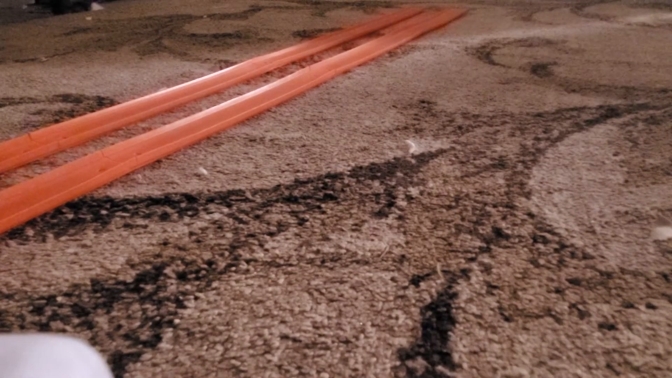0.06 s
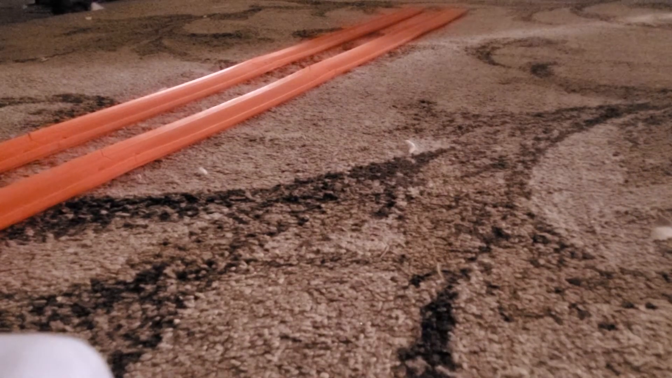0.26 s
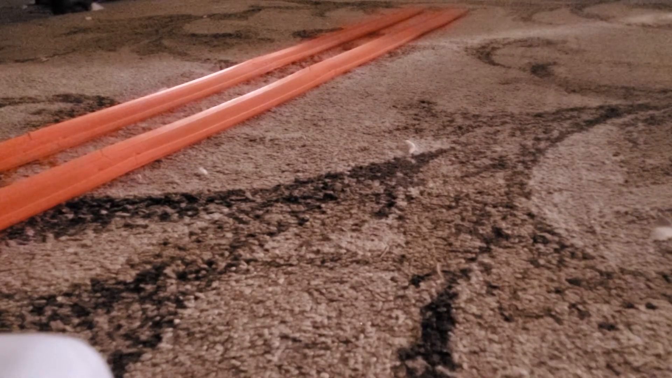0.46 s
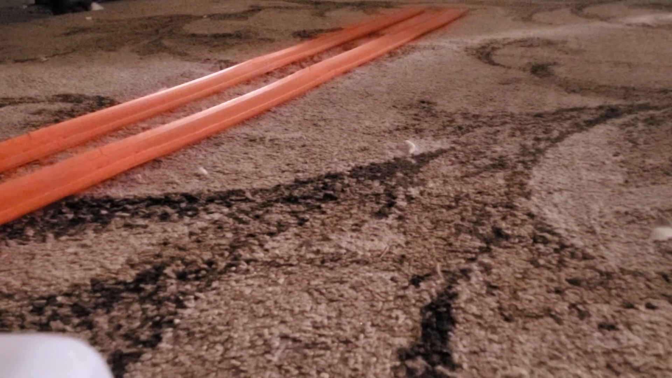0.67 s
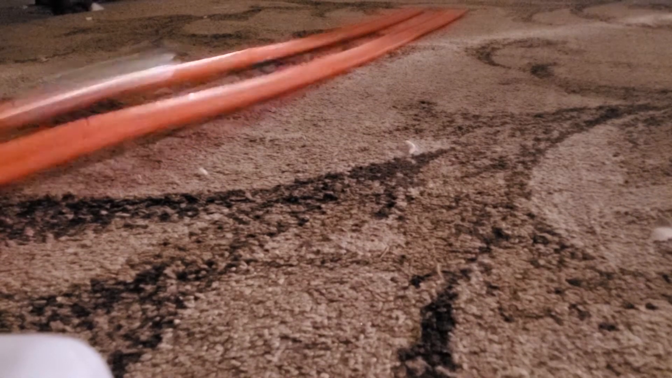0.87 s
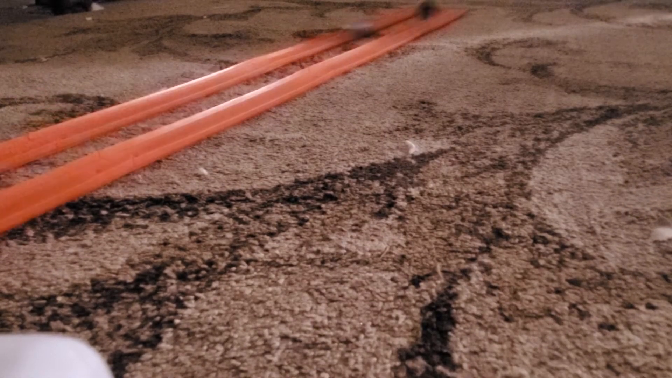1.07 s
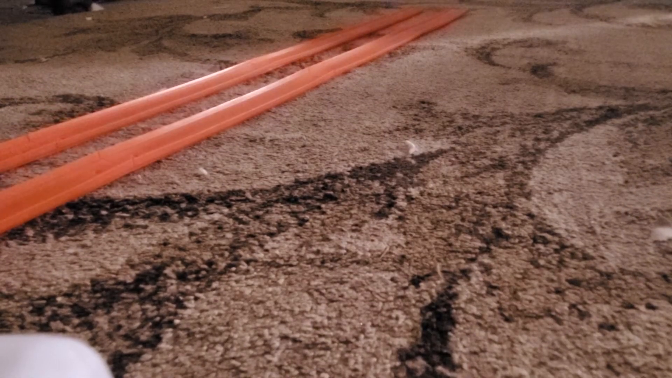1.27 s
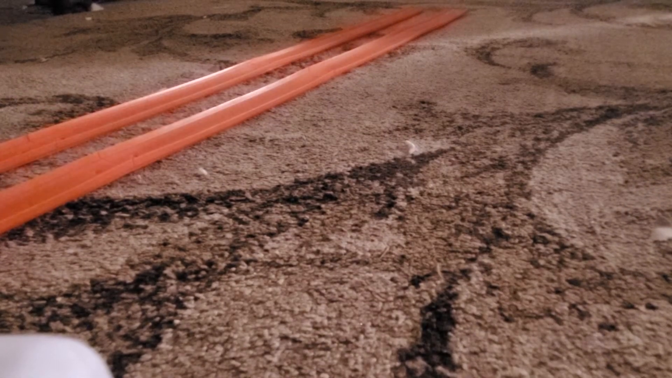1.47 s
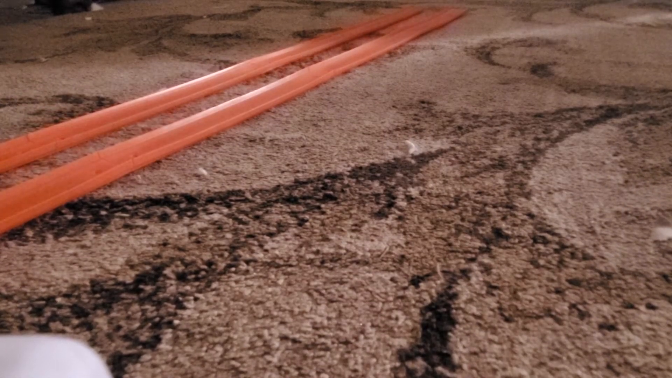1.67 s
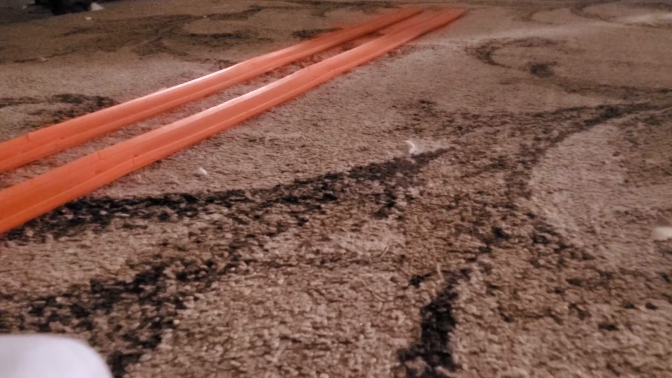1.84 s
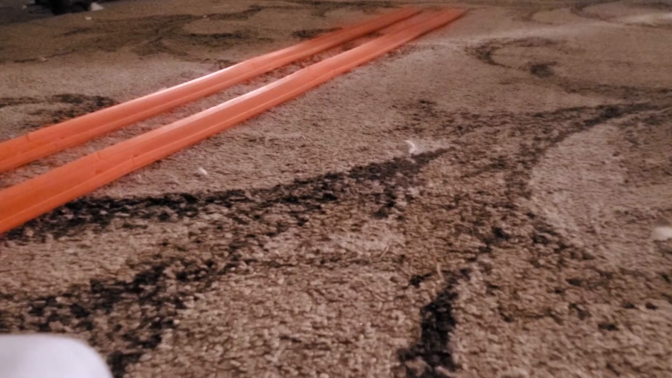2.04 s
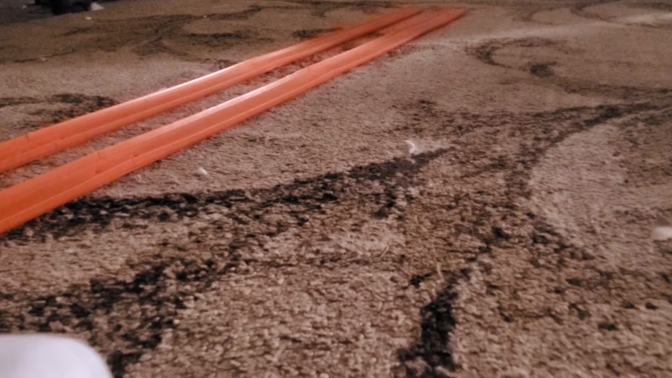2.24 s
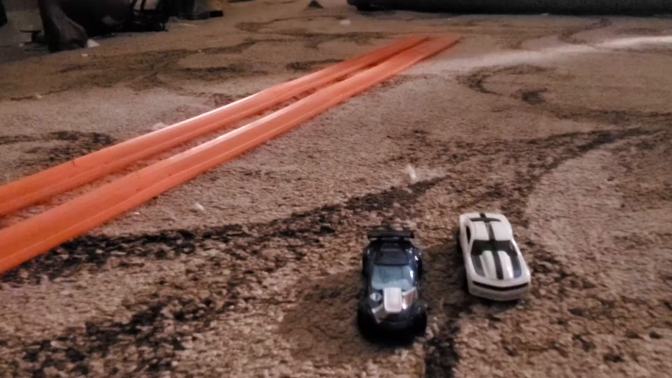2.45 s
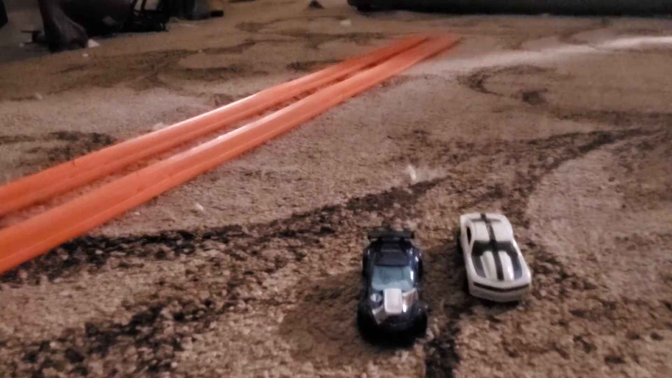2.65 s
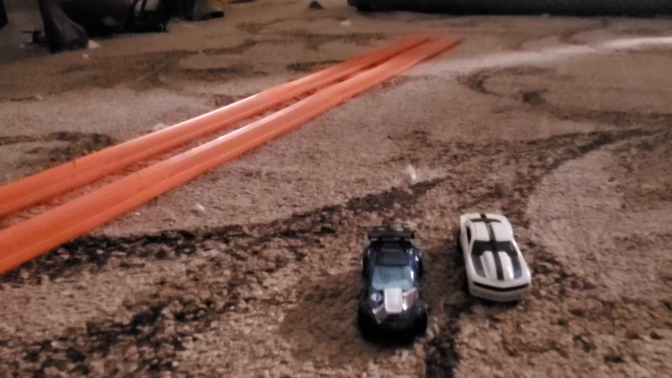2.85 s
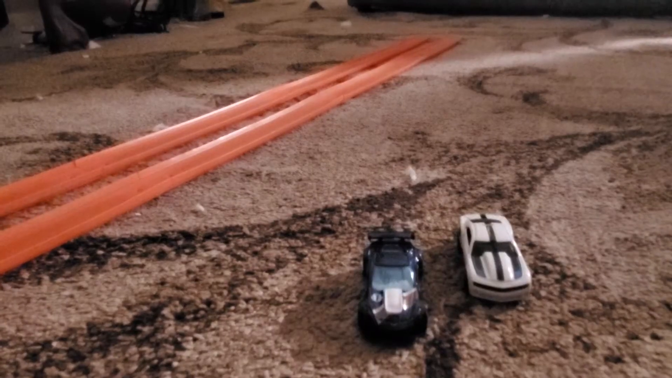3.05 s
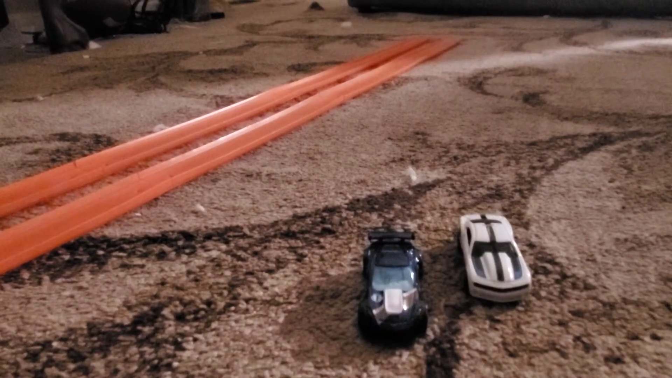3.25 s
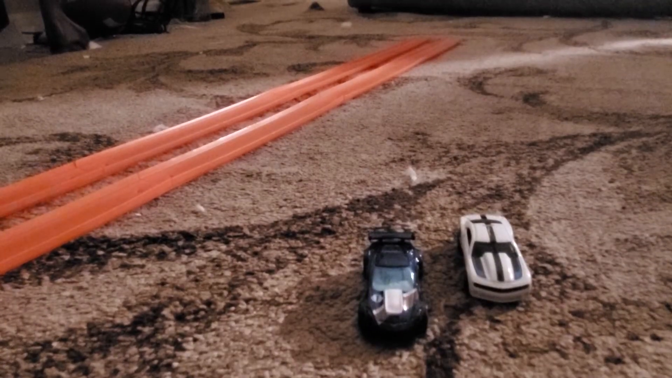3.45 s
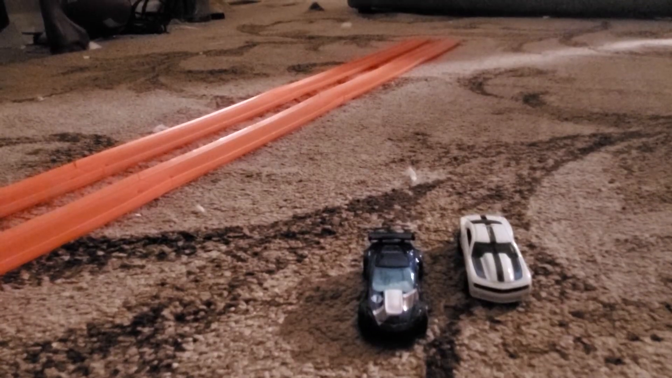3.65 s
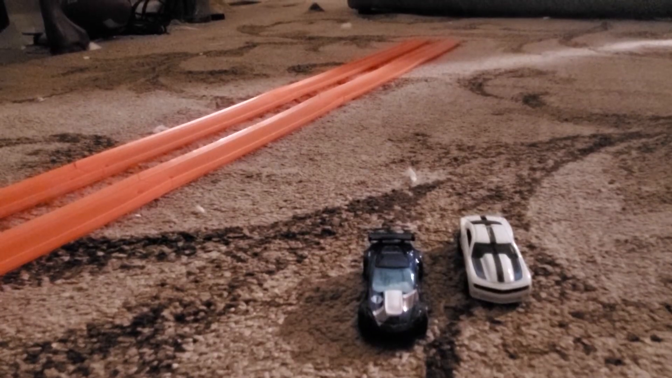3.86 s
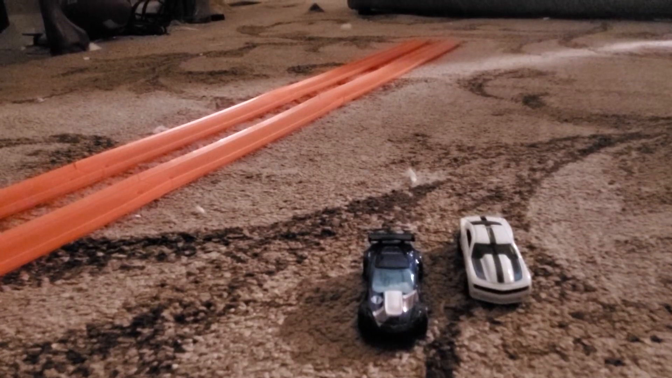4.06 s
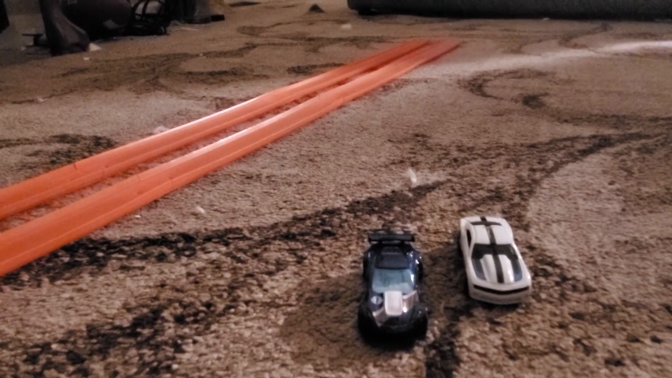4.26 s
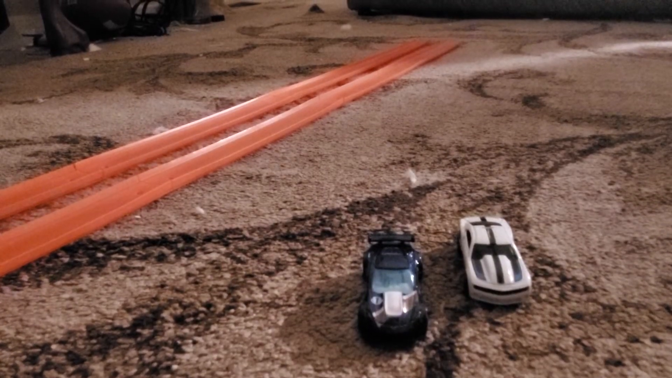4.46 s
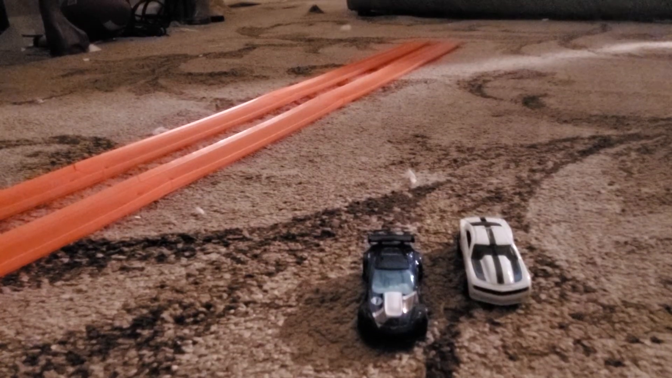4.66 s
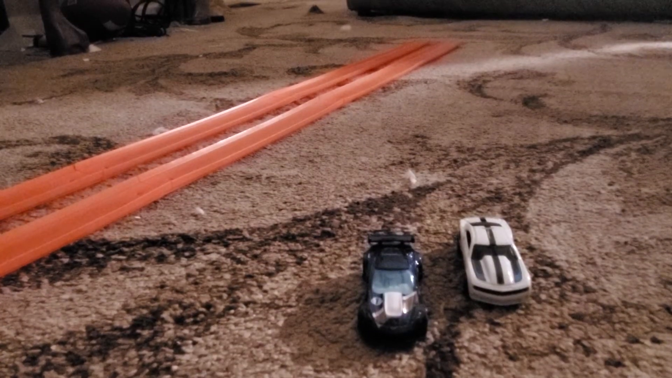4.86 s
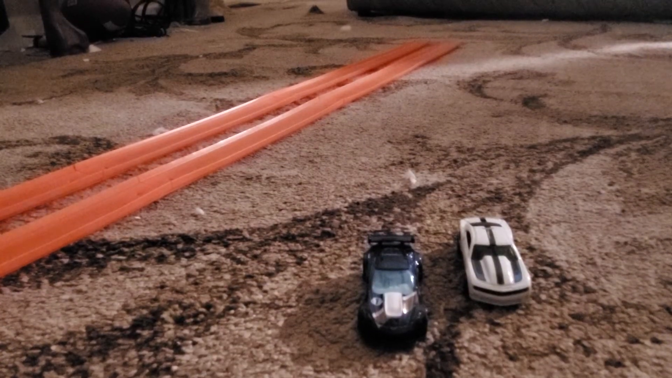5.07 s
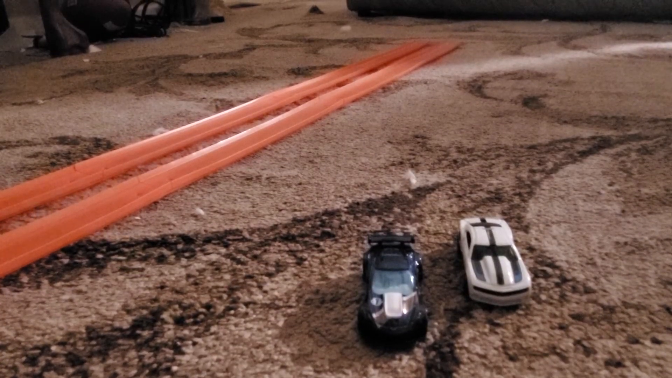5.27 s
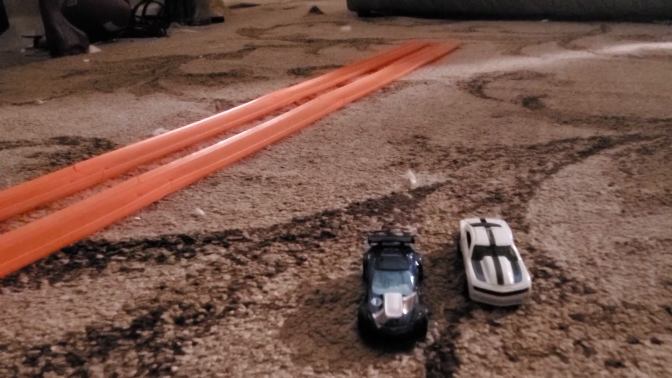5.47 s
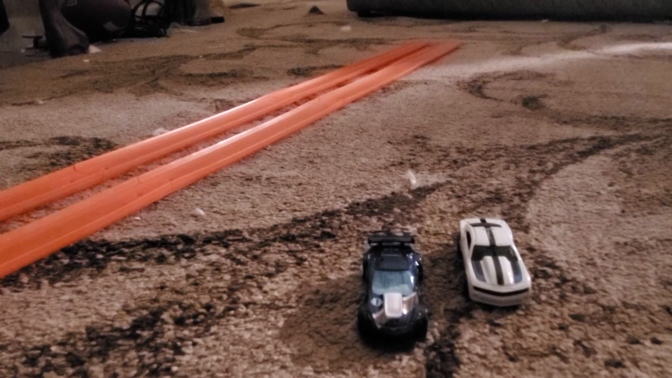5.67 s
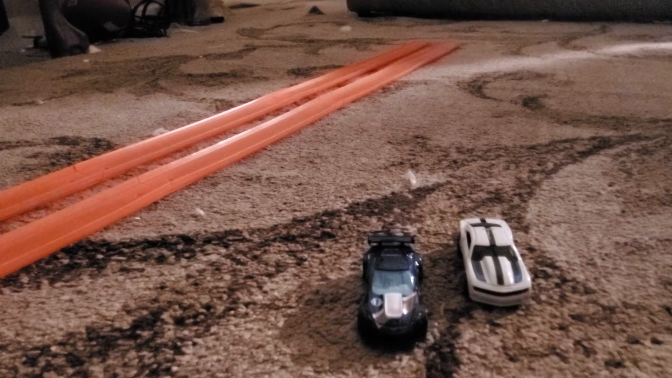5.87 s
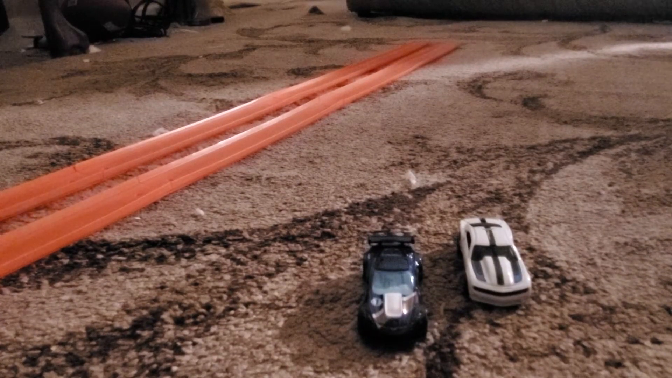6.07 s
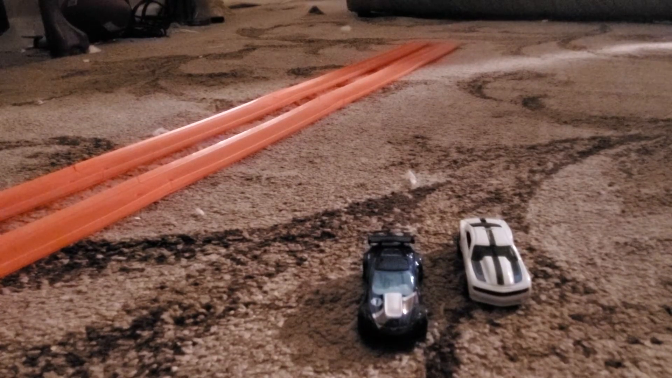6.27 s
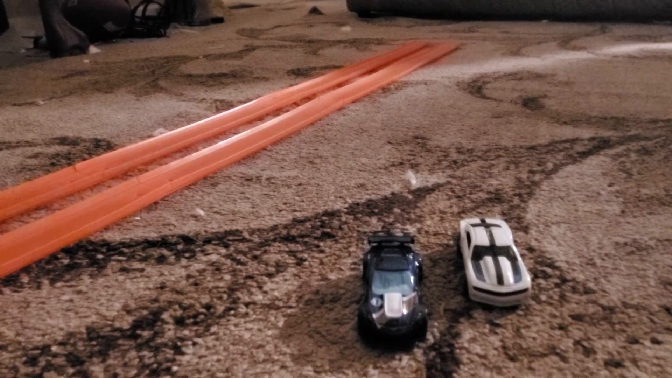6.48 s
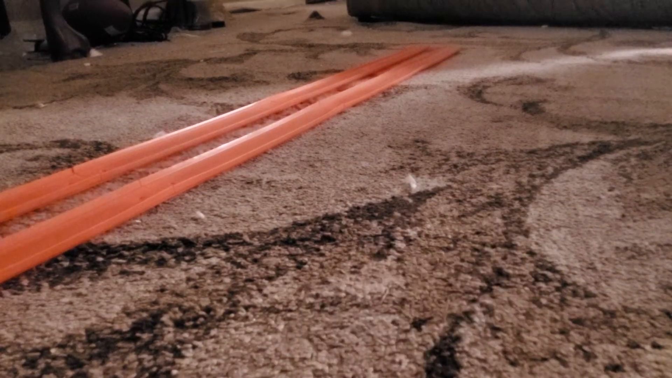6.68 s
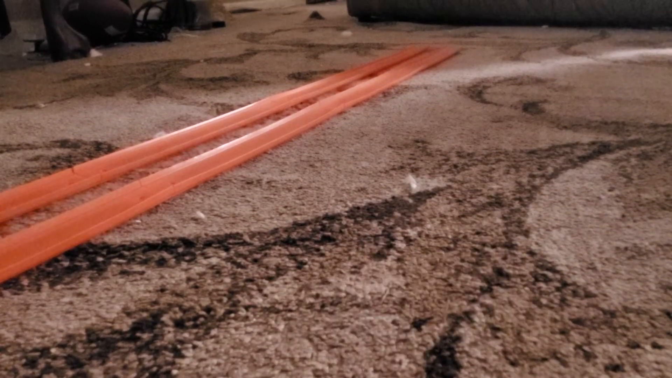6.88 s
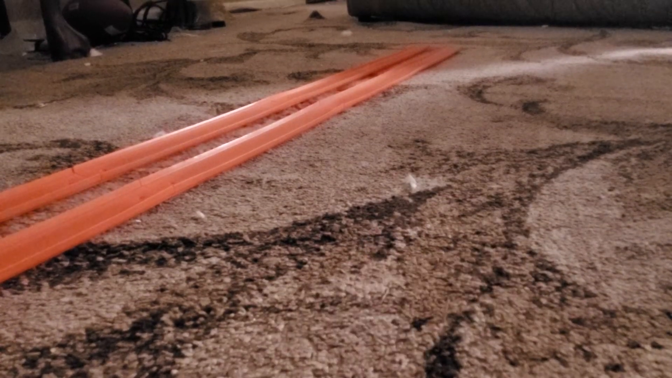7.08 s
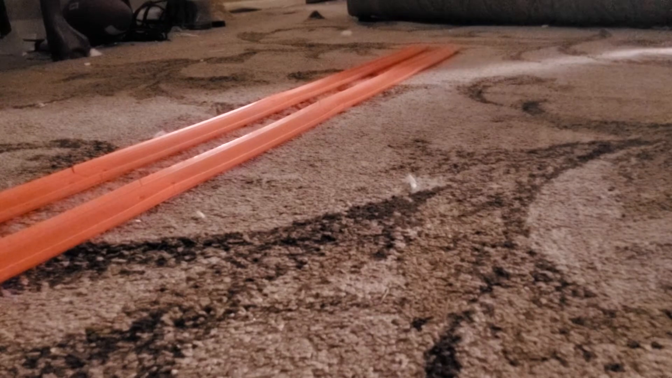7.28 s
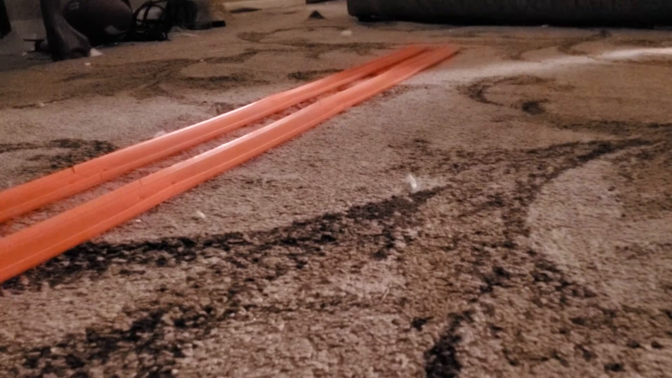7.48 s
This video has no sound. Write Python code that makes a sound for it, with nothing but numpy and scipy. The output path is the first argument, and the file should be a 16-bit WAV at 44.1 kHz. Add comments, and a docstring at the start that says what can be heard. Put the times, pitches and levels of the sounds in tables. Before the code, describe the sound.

Quiet carpeted room, close stereo microphone near the floor: low airy rumble, wavering fan and mains hum and thin hiss last throughout. A faint rustle opens, with a tiny knock at 0.17 s. At 0.79 s a spring launcher snaps loudly on the left, bouncing in several hard cracks until about 0.88 s while its hollow plastic housing rattles. Around 0.97 to 1.5 s toy cars whirr and clatter along plastic track, strongest at 1.0 s, with bright joint clacks and dull slaps, thinning rapidly. Faint metallic pings at 1.55 s and soft carpet hiss to 2.1 s end the run. The background sinks slightly, returning by 2.5 s. Soft knocks and ticks come near 2.5, 3.55, 4.75, 6.13 and 6.95 s; gentle cloth strokes at 2.7-3.7 and 4.9-5.5 s; dull faint swells at 6.2-7.3 s.

```python
"""Die-cast toy cars race to the right along plastic track laid on carpet: whirring contact noise, clacks at joints.
A spring launcher on the left starts them: bursts of contact noise and a shaking rattle excite its housing.
The run ends in a carpet hiss (dense grains) and metallic pings (resonances); slaps are damped sine thuds.
Soft low knocks, faint ticks, cloth strokes and swells of duller noise are heard before and mostly after the run.
Coloured air noise, wavering hum lines and a thin hiss last throughout, with one dip in level."""
import sys
import numpy as np
from scipy import signal
from scipy.fft import rfft, irfft, next_fast_len
from scipy.io import wavfile

SR = 44100
rng = np.random.default_rng(int(sys.argv[2]) if len(sys.argv) > 2 else 0)


def pcm_store(signal):
    """Save signal as 16-bit PCM."""
    levels = np.round(np.clip(np.atleast_2d(signal), -1, 1) * 32767)
    wavfile.write(sys.argv[1], SR, levels.astype(np.int16).T)


N = 332028
TIME = np.arange(N) / SR   # t/s

# Levels in the tables are relative: the source functions apply further gains.
# force of the wheels on the track, as heard from the side: t/s, level/dB
ROLL_FORCE = [(.96, -44), (1.003, -29), (1.06, -44), (1.13, -38.5), (1.2, -42.5), (1.34, -54), (1.45, -49),
              (1.53, -75), (1.75, -68), (1.8, -82.5)]
# spectral envelope of the track: f/Hz, level/dB
TRACK_SPECTRUM = [(290, -35), (500, -30), (659, -10), (1090, -8.5), (1600, -11), (1870, -12.5),
                  (3250, -5.5), (5240, -9.5), (5970, -4), (7310, -7.5), (11300, -9.5), (12700, -4),
                  (16000, -10)]
# resonances of the track: f/Hz, bandwidth/Hz, level/dB
TRACK_RESONANCES = [(1690, 65, 5), (3350, 56, -11), (3950, 135, -5.5), (5860, 140, 8.5), (6180, 26, -14.5),
                    (7360, 40, -21), (8800, 150, 3.5), (10000, 120, 11.5), (12700, 51, -38),
                    (12900, 60, -24), (14340, 36, 6), (15600, 240, 18)]
# loudest clacks of wheels over joints: t/s, level/dB, treble level/dB, struck part f/Hz, its ring level/dB
JOINT_CLACKS = [(.9915, -21.5, -8, 1950, -6), (1.0028, -17, 2.5, 11100, -8.5), (1.0195, -26, -5, 8670, -3),
                (1.045, -31.5, -4, 1460, 8.5), (1.0915, -23.5, 2, 13220, -5), (1.118, -24, 6, 5800, -1),
                (1.1975, -29.5, 10, 6040, -10), (1.277, -39, 7, 1600, -6), (1.3645, -39.5, 4, 5700, -3),
                (1.4285, -31.5, 4.5, 835, -2.5), (1.446, -30, -14, 1500, -21), (1.754, -53, -2, 11100, -2)]
# the cars' way past the ports: t/s, left-right level/dB, lag of the right port/ms
CAR_PATH = [(.95, -3, 0.25), (1.0, 5, 0.0041), (1.06, 0, -0.029), (1.4, -2.5, -0.017), (1.749, -23, -0.057)]
# launcher blows: t/s, level/dB, treble level/dB, struck part f/Hz, its ring level/dB
LAUNCHER_BLOWS = [(.7868, -6.5, 0, 1623, -3), (.8015, -21, 2, 5240, -4), (.8128, -13, 8, 978, -5.5),
                  (.8205, -16, -1, 3560, -1), (.8225, -14.5, 1, 3710, -2), (.8375, -20.5, -1, 2980, -0.5),
                  (.8478, -10, -4, 2190, -5.5), (.851, -13, -8, 1200, 0), (.863, -28, -10, 1164, 5),
                  (.882, -25.5, -7, 3800, 3.5)]
# spectral envelope of the launcher housing: f/Hz, level/dB
HOUSING_SPECTRUM = [(150, -20.5), (290, -18.5), (440, -8.5), (720, -10.5), (1020, -1), (1330, 0.5),
                    (1680, -7.5), (2050, -12), (2500, -4.5), (3200, -2.5), (3850, -3), (4300, -8.5),
                    (7500, -11), (16000, -12.5)]
# resonances of the launcher housing: f/Hz, bandwidth/Hz, level/dB
HOUSING_RESONANCES = [(990, 240, -5), (1240, 110, -3), (1860, 65, -14), (2330, 30, -12), (3080, 110, -8),
                      (3100, 55, -5), (3700, 40, -6.5), (3640, 45, -6), (3880, 70, -1.5), (6840, 110, -14)]
# hiss of wheels over carpet past the end of the track: t/s, hold/s, level/dB
CARPET_HISS = [(1.55, .03, -64), (1.62, .1, -68), (1.74, 0.017, -59.5), (1.86, 0.24, -81)]
# touches of a car's metal body at the end of its run: t/s, level/dB
METAL_TOUCHES = [(1.5475, -42), (1.551, -40.5), (1.566, -46)]
# resonances of that body: f/Hz, bandwidth/Hz, level/dB
METAL_RESONANCES = [(1990, 110, -5), (2540, 72, -8), (3260, 79, -4), (3580, 62, -2.5), (3780, 52, -8),
                    (8400, 230, -7), (13300, 410, -2), (14400, 320, -10), (15600, 260, -6)]
# slaps of the track on the carpet under the cars: t/s, level/dB, f/Hz, tick level/dB
TRACK_SLAPS = [(.7635, -37, 241, 5), (.788, -31, 196, -16), (.849, -26, 440, -9), (1.001, -31, 135, -20),
               (1.006, -37, 300, -22), (1.132, -41, 307, -17), (1.168, -29.5, 298, -2),
               (1.362, -38, 202, -22), (1.429, -37, 654, -5), (1.443, -30.5, 135, -27)]
# soft low knocks and faint, brief, bright ticks: t/s, level/dB, f/Hz, tick level/dB
KNOCKS_AND_TICKS = [(.167, -47.5, 1520, -26), (2.496, -44, 8400, -26), (2.569, -45.5, 3520, 3),
                    (2.573, -35, 414.4, -18), (3.548, -35.5, 237.5, -11.5), (4.755, -55.5, 1100, -4.5),
                    (6.129, -38.5, 189, -36), (6.946, -41.5, 465, -3.5)]
# strokes of cloth over carpet: t/s, hold/s, level/dB
CLOTH_STROKES = [(2.68, 0.056, -75), (2.81, 0.055, -69), (2.98, 0.074, -71), (3.19, .05, -71),
                 (3.33, .08, -71), (3.455, 0.062, -61), (3.56, .16, -76), (4.915, 0.028, -66),
                 (5.02, 0.15, -64), (5.33, .16, -66.5)]
# spectral envelope of the strokes: f/Hz, level/dB
STROKE_SPECTRUM = [(1180, -23), (2000, -15.5), (3370, -2), (5440, 4), (6530, 3), (10600, -6.5),
                   (15100, -5.5), (16000, -1)]
# faint swells of duller noise, rustles and soft whooshes: t/s, hold/s, level/dB
FAINT_SWELLS = [(0, 0.014, -55), (.09, 0.092, -67), (1.92, .16, -72.5), (4.755, .09, -67),
                (6.17, 0.038, -69), (6.345, 0.027, -70.5), (6.48, 0.017, -67), (6.89, 0.085, -60.5),
                (7.08, 0.18, -68.5)]
# spectral envelope of the faint swells: f/Hz, level/dB
SWELL_SPECTRUM = [(400, 12), (900, 3.5), (1400, -6), (2100, 0.5), (3300, -5.5), (4200, -3.5), (5800, -10),
                  (8000, -15), (16000, -24.5)]
# spectral envelope of the room's air noise: f/Hz, level/dB
AIR_SPECTRUM = [(20, -21.5), (35, -13.5), (50, -2), (100, -1), (140, -12.5), (200, -10), (260, -16),
                (350, -19), (520, -21), (620, -33), (740, -28), (860, -27), (1000, -39.5), (1300, -49)]
# spectral envelope of the thin hiss: f/Hz, level/dB
HISS_SPECTRUM = [(900, 2), (1200, 3), (1600, -1), (3000, -3.5), (4200, 1), (5500, -0.5), (9700, -1),
                 (10300, -7.5), (16000, -6)]
# correlation of the background noise at the two ports: f/Hz, correlation (dimensionless)
PORT_CORRELATION = [(30, 0.82), (130, 1), (290, 0.57), (640, 0.27), (1400, 0), (16000, 0)]
# drone of a fan and the mains: f/Hz, level/dB, wavering width/Hz
HUM_LINES = [(54, -64.5, 2.4), (79.2, -50.5, 2.3), (118.8, -57, .3), (177, -62.5, 4)]
# time in which the room's reflections die by 60 dB: f/Hz, t/s
ROOM_DECAY = [(150, 0.47), (1000, 0.21), (3500, 0.46), (8000, 0.3), (16000, .26)]

# reference moment and roll level for the hollow and rumble
PASS_S, PASS_DB = 0.96, -40
# the track's hollow middle, relative to the roll; it is lost as the cars get away
HOLLOW_DB, HOLLOW_FADE_DB_PER_S = -15.5, 36.5
# rumble at the reference roll level; share of the roll's dB swing that it follows
RUMBLE_DB, RUMBLE_FOLLOWS = -51, 0.78
# lighter clacks follow the roll: mean level above it, spread either way, pitch range, time range
LIGHT_CLACK_DB, LIGHT_SPREAD_DB, LIGHT_LOW_HZ, LIGHT_HIGH_HZ = 3.5, 3.5, 1410, 6950
LIGHT_START_S, LIGHT_END_S = 1, 1.48
# loose parts shake in the launcher from the first blow on, then settle
SHAKE_START_S, SHAKE_BUILD_S, SHAKE_HOLD_S, SHAKE_DB, SHAKE_FALL_DB_PER_S = .787, .03, 0.054, -33.5, 152
RUN_OUT_RISE_DB_PER_S, RUN_OUT_FALL_DB_PER_S = 700, 450
# cycles in which a thud dies by 60 dB, and time constant of its onset in cycles
THUD_CYCLES, THUD_ATTACK_CYCLES = 15, .25
BRUSH_RISE_DB_PER_S, BRUSH_FALL_DB_PER_S = 220, 170
# a stroke of table level FIRM_DB brings a rub of RUB_DB; RUB_GROWTH is dB of rub per dB of stroke
FIRM_DB, RUB_DB, RUB_GROWTH = -64, -64, 1.28
SWELL_RISE_DB_PER_S, SWELL_FALL_DB_PER_S = 1600, 125
# the whole background sinks slowly and comes back
DIP_START_S, DIP_SINK_S, DIP_END_S, DIP_RETURN_S, DIP_DB = 1.06, 0.96, 2.5, 0.19, -4.5
CUTOFF_HZ = 15950


def cars():
    """Forced vibration: grainy wheel contact and joint impacts excite the track; the moving source pans right."""
    roll = level(ROLL_FORCE)
    chatter = grains(per_s=2200, spread_db=2.5)
    chatter = chatter * from_db(3.4 * drift(40))   # the wheels skip and bite
    clacks = from_db(-7) * blows(JOINT_CLACKS, contact_ms=3.64, treble_hz=7000, part_width_hz=360)
    force = from_db(-4.5) * roll * chatter + clacks + light_clacks(ring_db=0, count=26)

    broad = colour(force, TRACK_SPECTRUM)
    ringing = resonate(force, TRACK_RESONANCES)
    track = from_db(-0.5) * broad + from_db(-9.0) * ringing

    hollow_noise = rms_one(cut(grains(per_s=1000, spread_db=5), [850, 2300], "band"))
    hollow = roll * from_db(HOLLOW_DB - HOLLOW_FADE_DB_PER_S * (TIME - PASS_S)) * hollow_noise
    rumble_noise = rms_one(cut(grains(per_s=240, spread_db=1.0), [140, 420], "band"))
    rumble = from_db(RUMBLE_DB) * (roll / from_db(PASS_DB)) ** RUMBLE_FOLLOWS * rumble_noise

    moving = wander(np.ravel(track + hollow), echo_ms=0.58, swing_ms=.2, depth=0.45, rate=6)
    s, pan_db, lag_ms = np.transpose(CAR_PATH)
    direct = place(moving, np.interp(TIME, s, pan_db), np.interp(TIME, s, lag_ms))
    return direct + rumble + from_db(-1.5) * room(moving)


def light_clacks(ring_db, count):
    """Random impacts: wheels tap the rails along the run, each time ringing another part."""
    roll_s, roll_db = np.transpose(ROLL_FORCE)
    when, strength, pitch = rng.random((count, 3)).T
    s = LIGHT_START_S + when * (LIGHT_END_S - LIGHT_START_S)
    db = np.interp(s, roll_s, roll_db) + LIGHT_CLACK_DB + LIGHT_SPREAD_DB * (2 * strength - 1)
    hz = LIGHT_LOW_HZ * (LIGHT_HIGH_HZ / LIGHT_LOW_HZ) ** pitch
    taps = [(at, peak_db, 0, part_hz, ring_db) for at, peak_db, part_hz in zip(s, db, hz)]
    return blows(taps, contact_ms=0.88, treble_hz=7000, part_width_hz=80)


def wander(x, echo_ms, swing_ms, depth, rate):
    """Comb interference: a bending wave returns from the nearest joint; its changing delay moves the notches."""
    delay_s = np.abs(echo_ms + swing_ms * drift(rate)) / 1000
    echo = np.interp(TIME - delay_s, TIME, x)
    return (x + depth * echo) / np.sqrt(1 + depth ** 2)


def launcher():
    """Impact excitation: the plunger hits its stop and bounces; the hollow plastic housing rings and shakes."""
    settling_s = np.maximum(TIME - SHAKE_START_S - SHAKE_BUILD_S - SHAKE_HOLD_S, 0)
    shake = ramp(SHAKE_START_S, SHAKE_BUILD_S) * from_db(SHAKE_DB - SHAKE_FALL_DB_PER_S * settling_s)
    rattle = shake * grains(per_s=530, spread_db=3)
    impacts = from_db(-5.5) * blows(LAUNCHER_BLOWS, contact_ms=1.7, treble_hz=6026, part_width_hz=180)
    force = impacts + rattle

    broad = colour(force, HOUSING_SPECTRUM)
    ringing = resonate(force, HOUSING_RESONANCES)
    housing = from_db(2.0) * broad + from_db(-10.0) * ringing
    body = cut(housing, 5000, "low", order=1)
    crack = housing - body
    # the far port is shadowed most in the treble, and the carpet swallows treble reflections
    direct = place(body, pan_db=4, lag_ms=.45) + place(crack, pan_db=10, lag_ms=0.41)
    reflected = room(body + from_db(-2.0) * crack, build_s=0.011) * from_db([[-1], [1]])
    return direct + from_db(-4.5) * reflected


def run_out():
    """Friction noise: many tiny contacts of wheels in the carpet's pile merge into a broad, soft hiss."""
    contacts = np.array([grains(per_s=6000, spread_db=4) for port in range(2)])
    pile = rms_one(cut(contacts, [1500, 14000], "band", order=1))
    strength = swells(CARPET_HISS, RUN_OUT_RISE_DB_PER_S, RUN_OUT_FALL_DB_PER_S)
    pan_db = -7
    return strength * pile * from_db([[pan_db / 2], [-pan_db / 2]])


def ping():
    """Modal ringing: brief touches excite a metal body far along the floor, with its echo in the room."""
    touches = [(s, db, 0, 3500, -12) for s, db in METAL_TOUCHES]
    contact = blows(touches, contact_ms=1.1, treble_hz=7000, part_width_hz=460)
    metal = resonate(contact, METAL_RESONANCES)
    return from_db(-3) * place(metal, pan_db=1, lag_ms=-0.087) + room(metal)


def bumps():
    """Damped oscillation: dull slaps of the track, soft knocks and faint ticks."""
    slaps = thuds(TRACK_SLAPS, overtone_ratio=2.02, overtone_db=-10, tick_hz=1216, tick_s=.004)
    knocks = thuds(KNOCKS_AND_TICKS, overtone_ratio=1.73, overtone_db=-8.5, tick_hz=2470, tick_s=0.0021)
    direct = from_db(0.5) * slaps + place(knocks, pan_db=-11.5, lag_ms=0)
    return direct + from_db(-9.0) * room(slaps + knocks)


def cloth():
    """Friction noise: fibres slide in soft strokes; firmer strokes add a lower rub."""
    hiss = swells(CLOTH_STROKES, BRUSH_RISE_DB_PER_S, BRUSH_FALL_DB_PER_S)
    rub = from_db(RUB_DB) * (hiss / from_db(FIRM_DB)) ** RUB_GROWTH
    fibres = colour(rng.standard_normal((2, N)), STROKE_SPECTRUM) * from_db(1 * drift(40))
    high_fibres = rms_one(cut(fibres, 5930, "high"))
    low_fibres = rms_one(cut(fibres, 4370, "low"))
    strokes = from_db(6) * hiss * high_fibres + rub * low_fibres
    pan_db = -9.5
    return strokes * from_db([[pan_db / 2], [-pan_db / 2]])


def faint_swells():
    """Filtered shot noise: dense grains, unrelated at the two ports, swell faintly as rustles and soft whooshes."""
    soft_noise = np.array([grains(per_s=9000, spread_db=-0.5) for port in range(2)])
    gain = from_db(6.0) * swells(FAINT_SWELLS, SWELL_RISE_DB_PER_S, SWELL_FALL_DB_PER_S)
    return gain * colour(soft_noise, SWELL_SPECTRUM)


def background():
    """Stationary noise and narrow-band lines: air rumble, wavering hum and thin hiss, a little stronger right."""
    air = from_db(-48.5) * rms_one(cut(colour(wide_noise(), AIR_SPECTRUM), 1200, "low", order=4))
    hiss = from_db(-72) * rms_one(cut(colour(wide_noise(), HISS_SPECTRUM), 1000, "high"))
    hum = 0
    for hz, db, width_hz in HUM_LINES:
        waver = drift(width_hz) + 1j * drift(width_hz)   # random amplitude and phase
        line = np.real(waver * np.exp(2j * np.pi * hz * TIME))
        hum = hum + from_db(db) * rms_one(line)
    throb = from_db(1.5 * drift(4.3))   # the low drone swells and ebbs a few times a second
    dip = ramp(DIP_START_S, DIP_SINK_S) - ramp(DIP_END_S - DIP_RETURN_S, DIP_RETURN_S)
    return (air + hum * throb + hiss) * from_db(DIP_DB * dip) * from_db([[.1], [.7]])


def wide_noise():
    """Partial coherence: stereo noise, alike at both ports in the bass and unrelated in the treble."""
    size = next_fast_len(N, real=True)
    hz = np.arange(size // 2 + 1) * SR / size
    alike = np.clip(at_hz(PORT_CORRELATION, hz), -1, 1)
    mid, side = rfft(rng.standard_normal((2, size)))
    common = np.sqrt((1 + alike) / 2) * mid
    opposed = np.sqrt((1 - alike) / 2) * side * [[1], [-1]]
    return irfft(common + opposed, size)[:, :N]


def blows(rows, contact_ms, treble_hz, part_width_hz, size=2048):
    """Impact: a few ms of decaying buzz with its own share of treble, and a brief ring of the struck part."""
    out = np.zeros(N + size)
    fade = np.exp(-np.arange(size) / SR * 1000 / contact_ms)
    for s, db, treble_db, part_hz, part_db in rows:
        buzz = rms_one(rng.standard_normal(size) * fade)
        dull = cut(buzz, treble_hz, "low", order=1)
        ring = rms_one(resonate(buzz, [(part_hz, part_width_hz, 0)]))
        blow = dull + from_db(treble_db) * (buzz - dull) + from_db(part_db) * ring
        out[round(s * SR):][:size] += from_db(db) * blow * np.sqrt(np.mean(fade ** 2))
    return out[:N]


def thuds(rows, overtone_ratio, overtone_db, tick_hz, tick_s, size=8192):
    """Damping per cycle: a softly started ring with one overtone and a short tick; higher ones die in fewer ms."""
    out, t = np.zeros(N + size), np.arange(size) / SR
    for s, db, hz, tick_db in rows:
        cycles = hz * t
        fade = from_db(-60 * cycles / THUD_CYCLES) * (1 - np.exp(-cycles / THUD_ATTACK_CYCLES))
        fundamental = np.sin(2 * np.pi * cycles)
        overtone = from_db(overtone_db) * np.sin(2 * np.pi * overtone_ratio * cycles)
        ring = (fundamental + overtone) * fade
        tick = cut(rng.standard_normal(size) * np.exp(-t / tick_s), tick_hz, "low")
        out[round(s * SR):][:size] += from_db(db) * (ring + from_db(tick_db) * tick)
    return out[:N]


def grains(per_s, spread_db):
    """Shot noise: tiny contacts of uneven size at random moments; rms 1."""
    sizes = from_db(spread_db * np.minimum(rng.exponential(1, N), 4)) * rng.choice([-1, 1], N)
    return rms_one(sizes * (rng.random(N) < per_s / SR))


def place(x, pan_db, lag_ms):
    """Level and time differences: a source on the left is louder there and reaches the right port later."""
    x = np.ravel(x)
    late = np.interp(TIME - lag_ms / 1000, TIME, x)
    return np.array([x * from_db(pan_db / 2), late * from_db(-pan_db / 2)])


def room(x, build_s=0.0045, size=24000):
    """Reverberation: diffuse reflections, different at each port, with a decay time that varies with frequency."""
    t, edges = np.arange(size) / SR, np.geomspace(80, 18000, 10)
    tail = 0
    for low, high in zip(edges, edges[1:]):
        decay = from_db(-60 * t / at_hz(ROOM_DECAY, np.sqrt(low * high)))
        tail = tail + cut(rng.standard_normal((2, size)), [low, high], "band") * decay
    tail = rms_one(tail * (1 - np.exp(-t / build_s))) / np.sqrt(size)
    return signal.oaconvolve(np.atleast_2d(x), tail, axes=-1)[:, :N]


def resonate(x, modes):
    """Modal superposition: parallel two-pole resonances of alternating sign; white noise keeps its level."""
    out, power = 0, 0
    for k, (hz, width, db) in enumerate(modes):
        r = np.exp(-np.pi * width / SR)   # pole radius
        zeros = np.array([1, 0, -1]) * (1 - r * r) / 2
        poles = [1, -2 * r * np.cos(2 * np.pi * hz / SR), r * r]
        out = out + (-1) ** k * from_db(db) * signal.lfilter(zeros, poles, x + 1e-18)
        power += from_db(db) ** 2 * np.pi * width / SR
    return out / np.sqrt(power)


def colour(x, spectrum, size=8192):
    """Causal (minimum-phase) filtering by the given spectrum; white noise keeps its level."""
    gain = rms_one(from_db(at_hz(spectrum, np.arange(size // 2 + 1) * SR / size)))
    cepstrum = irfft(np.log(gain))
    cepstrum[1:size // 2] *= 2   # fold onto positive time
    cepstrum[size // 2 + 1:] = 0
    response = irfft(np.exp(rfft(cepstrum)))
    return signal.oaconvolve(np.atleast_2d(x), response[None], axes=-1)[:, :N]


def cut(x, hz, kind, order=2):
    """Butterworth filtering: a maximally flat pass band."""
    return signal.sosfilt(signal.butter(order, hz, kind, fs=SR, output="sos"), x + 1e-18)


def swells(rows, rise_db_per_s, fall_db_per_s):
    """Exponential rise and decay: each swell rises, holds and falls away; the strongest prevails."""
    each = []
    for s, hold_s, db in rows:
        before_s = np.maximum(s - TIME, 0)
        after_s = np.maximum(TIME - s - hold_s, 0)
        each.append(db - rise_db_per_s * before_s - fall_db_per_s * after_s)
    return from_db(np.maximum(np.max(each, axis=0), -200))


def drift(rate):
    """Slow random modulation: Gaussian knots, two per 1/rate seconds, joined by lines; spread about 1."""
    knots = rng.standard_normal(int(N / SR * rate * 2) + 4)
    return np.interp(TIME * rate * 2, np.arange(len(knots)), knots) / np.sqrt(2 / 3)


def ramp(start_s, length_s):
    """Linear transition from 0 to 1."""
    return np.clip((TIME - start_s) / length_s, 0, 1)


def level(rows):
    """Logarithmic envelope: gain from a dB curve, silent outside it."""
    s, db = np.transpose(rows)
    return from_db(np.interp(TIME, s, db)) * (TIME >= s[0]) * (TIME <= s[-1])


def at_hz(points, hz):
    """Interpolation of a spectrum on a log-frequency axis."""
    f, value = np.transpose(points)
    return np.interp(np.log(np.maximum(hz, 1)), np.log(f), value)


def from_db(db):
    """Level to amplitude: decibels become a linear gain."""
    return 10 ** (np.asarray(db) / 20)


def rms_one(x):
    """Power normalisation: scale to rms 1."""
    return x / np.sqrt(np.mean(x ** 2) + 1e-20)


def scene():
    """Superposition: the sources add at the two ports."""
    return cars() + launcher() + run_out() + ping() + bumps() + cloth() + faint_swells() + background()


def record(dry):
    """Saturation and band limiting: peaks are rounded, then the top is cut."""
    rounded = np.tanh(dry)
    return signal.sosfilt(signal.ellip(12, .1, 80, CUTOFF_HZ, fs=SR, output="sos"), rounded)


dry = scene()
out = record(dry)
pcm_store(out)
```